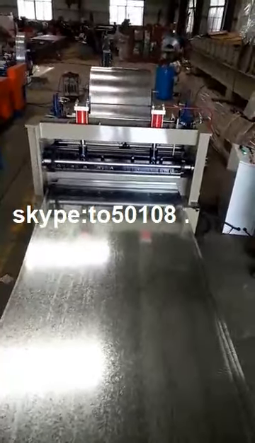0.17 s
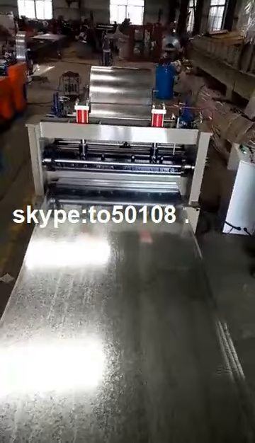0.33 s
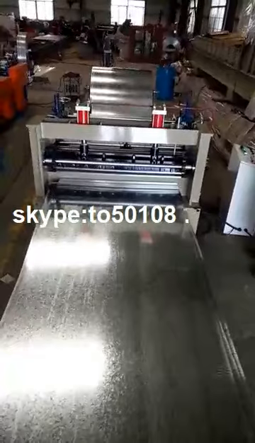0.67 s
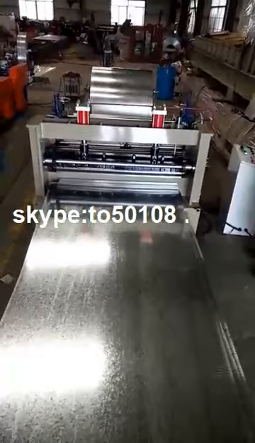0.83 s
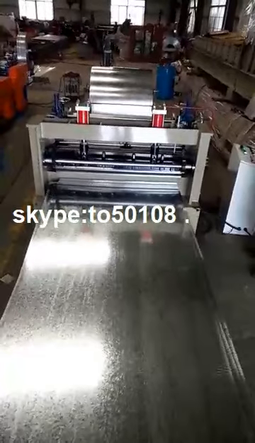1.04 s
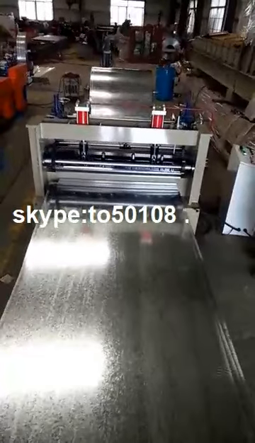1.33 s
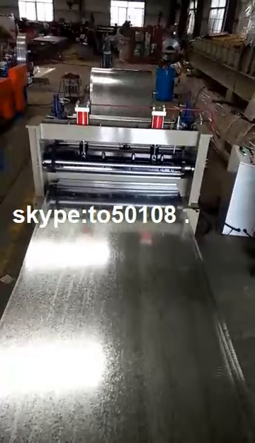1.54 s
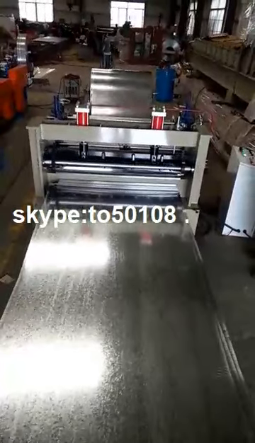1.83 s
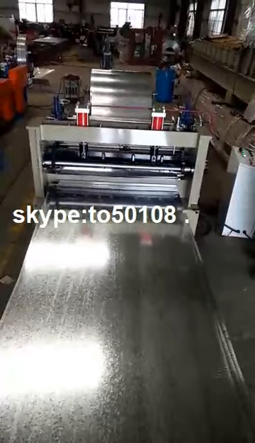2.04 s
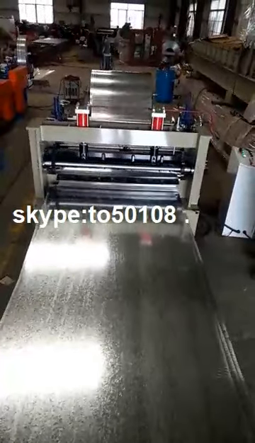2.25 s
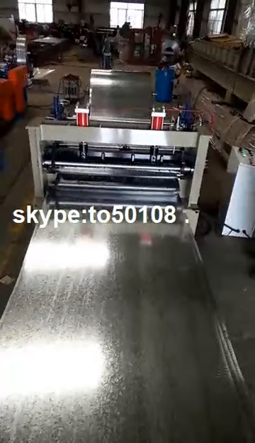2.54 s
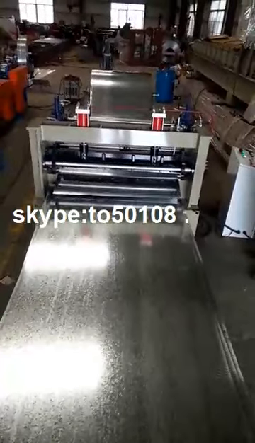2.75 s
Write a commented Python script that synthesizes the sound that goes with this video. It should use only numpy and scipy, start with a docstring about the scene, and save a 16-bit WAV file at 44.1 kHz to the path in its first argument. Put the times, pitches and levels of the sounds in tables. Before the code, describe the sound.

A moving metal sheet rumbles and flexes in a roaring factory hall after a distant steel clang

```python
"""A moving metal sheet rumbles, booms and flexes with soft bumps: shaped noise and wavering low modes.
It slides with a flickering hiss and scuffs over the rollers: swells of shaped noise.
At the start a piece of steel clangs some way off: beating modes ring out over a short noise crash.
Behind it, factory machinery roars steadily (shaped noise) with a faint, throbbing motor hum (tones)."""
import sys
import numpy as np
from scipy import signal
from scipy.fft import rfft, irfft, next_fast_len
from scipy.io import wavfile

SR = 44100
rng = np.random.default_rng(int(sys.argv[2]) if len(sys.argv) > 2 else 0)


def digitize_waveform(pressure):
    """Quantize a signal to 16-bit integers and store it at the path in sys.argv[1].

    Rows of a 2-D input are taken as channels; values are limited to [-1, 1].
    """
    field = np.atleast_2d(pressure).T
    bounded = np.clip(field, -1, 1)
    quanta = np.round(bounded * 32767).astype(np.int16)
    wavfile.write(sys.argv[1], SR, quanta)


N = 127449
T = np.arange(N) / SR

# sheet rumble spectrum: (frequency [Hz], relative density [dB])
RUMBLE_SPECTRUM = [(25, -21), (42, -24.5), (58, -8.5), (80, -9.5), (110, 0), (150, 2.5), (200, 3.5),
                   (280, 0), (370, 0.5), (520, -6), (800, -2), (2000, -78.5)]
# sheet rumble: (time [s], level [dB])
RUMBLE_LEVEL = [(0, -40), (.25, -40), (.45, -51), (1.11, -45.5), (1.16, -30.5), (1.3, -33.5), (1.42, -29),
                (1.54, -36), (1.66, -26.5), (1.88, -29), (2.0, -30), (2.3, -28), (2.5, -28.5),
                (2.89, -27.5)]
# lowest modes of the sheet: (frequency [Hz], relative level [dB])
BOOM_MODES = [(72, -1), (98, -2)]
# boom of those modes: (time [s], gain [dB])
BOOM_LEVEL = [(0, -56.5), (1.3, -56), (1.55, -43.5), (1.65, -33), (1.9, -37.5), (2.0, -40), (2.15, -39.5),
              (2.4, -34), (2.52, -55), (2.66, -33), (2.89, -39)]
# flexes of the sheet: (onset [s], level [dB], centre [Hz])
BUMPS = [(1.63, -27.5, 85), (1.69, -27.5, 280), (1.79, -29.5, 265), (1.85, -28.5, 105), (1.97, -29.5, 200),
         (2.08, -29, 290), (2.15, -31, 73), (2.25, -28.5, 100), (2.35, -29, 140), (2.77, -25, 253),
         (2.85, -22, 290)]
# sliding hiss spectrum: (frequency [Hz], relative density [dB])
HISS_SPECTRUM = [(4000, -32.5), (6500, -24.5), (7400, -11), (8600, 1.5), (10000, -16.5), (11400, 20),
                 (12400, 20.5), (14200, 14), (15500, -9)]
# sliding hiss: (time [s], level [dB])
HISS_LEVEL = [(0, -58), (.4, -97), (.9, -83), (1.02, -71.5), (1.08, -60), (1.27, -66.5), (1.4, -62),
              (1.6, -64.5), (1.67, -54), (1.9, -59.5), (2.13, -54.5), (2.2, -49.5), (2.3, -58), (2.5, -59),
              (2.72, -55.5), (2.79, -47.5), (2.89, -52)]
# scuffs on the rollers: (onset [s], level [dB], start of the falling noise band [Hz])
SCUFFS = [(2.15, -32.5, 9030), (2.738, -32, 9700)]
# scuff spectrum: (frequency [Hz], relative density [dB])
SCUFF_SPECTRUM = [(400, -16), (1500, 5), (2300, 1.5), (4000, -7.5), (5000, -15), (5600, -42), (6600, -45),
                  (7600, -29), (8600, -17.5), (10200, -44), (11200, -15.5), (12300, -20.5), (15000, -30)]
# modes of the struck steel: (frequency [Hz], relative level [dB], t60 [s], width [Hz])
STEEL_MODES = [(1260, -42, 1.9, 14), (1271, -39, 1.9, 14), (1421, -46, 1.8, 18), (1538, -39.5, 2.0, 20),
               (1684, -45, 1.7, 20), (2089, -52, 1.6, 18), (2213, -46, 1.9, 18), (2631, -53, 1.7, 18),
               (2740, -37.5, 2.2, 16), (2972, -40, 1.9, 18), (2988, -43, 2.4, 28), (3020, -49, 1.6, 30),
               (3322, -49, 2.5, 18), (3345, -51, 2.3, 24), (3401, -53, 2.0, 18), (3806, -46.5, 1.9, 24),
               (3823, -44, 2.0, 18), (4026, -54, 1.7, 26), (4691, -46, 1.7, 24), (4730, -57, 1.5, 30),
               (4844, -53, 1.45, 22), (5630, -54, 1.35, 22), (6586, -56, 1.2, 22), (7316, -70, .85, 40),
               (7562, -61.5, .95, 24), (8554, -68, .98, 22)]
# blows on the steel: (onset [s], relative level [dB])
CLANGS = [(.037, 4.5), (.078, 3), (.165, -2)]
# crash of the blows in the hall: (frequency [Hz], relative density [dB])
CRASH_SPECTRUM = [(200, -31), (700, 6), (1500, -8), (2300, -3.5), (3000, -3.5), (4300, -12.5), (5500, -31),
                  (7500, -20), (9500, -65), (12000, -21), (15000, -54)]
# machinery roar spectrum, lower part: (frequency [Hz], relative density [dB])
ROAR_SPECTRUM = [(15, -79), (25, -27), (69, -51.5), (92, -8), (220, -8.5), (245, -8.5), (293, -4.5),
                 (399, -6), (569, -4.5), (887, 0), (969, -2.5), (1380, -2), (2410, -14.5), (3920, -20.5),
                 (5000, -37), (6500, -139), (11000, -120)]
# machinery roar spectrum, top part: (frequency [Hz], relative density [dB])
ROAR_TOP_SPECTRUM = [(5400, -62), (8000, -58.5), (16000, -94.5)]
# machinery roar: (time [s], level [dB])
ROAR_LEVEL = [(0, -25.5), (.5, -26.5), (1.0, -27), (1.6, -26.5), (2.0, -25.5), (2.25, -24.5), (2.5, -25.5),
              (2.89, -25)]
# motor hum lines: (frequency [Hz], relative level [dB])
HUM_LINES = [(98, -47), (300, -42), (574, -47), (737, -49)]
# motor hum, before the throb: (time [s], gain [dB])
HUM_LEVEL = [(0, -4), (.28, 0.5), (.75, 1), (1.0, -3), (1.45, 1.5), (2.1, 3.5), (2.89, -1.5)]

BOOM_SCATTER, BOOM_WIDTH_HZ = 1.2, 12
BUMP_RISE_S, BUMP_T60_S, BUMP_STEP_OCT = 0.026, 0.42, 0.3
FLICKER_DB, FLICKER_HZ, PATCH_HZ = 2.2, 22, 700
SCUFF_RISE_S, SCUFF_T60_S = 0.086, 0.63
BAND_REL_DB, BAND_FALL_OCT_PER_S, BAND_WIDTH_HZ = -26, 1.4, 420  # level relative to the scuff
CRASH_REL_DB, CRASH_RISE_S, CRASH_T60_S = -33, 0.037, 0.55
RING_REL_DB, RING_RISE_S, RING_SCATTER = 1.5, 0.04, 0.85
SKIRT_REL_DB, SKIRT_WIDTH_HZ = -9.5, 80  # level relative to the mode line
HUM_SCATTER, HUM_WAVER_HZ = 0.29, 2
THROB_DEPTH, THROB_PERIOD_S, THROB_PEAK_S = 0.65, 0.37, 0.34
EDGE_HZ = 15350  # recorder's upper limit


def sheet_rumble():
    """The sheet shudders (noise), booms (low modes) and bumps (a noise band per flex)."""
    modes = sum(amp(db) * tone(hz, BOOM_SCATTER, BOOM_WIDTH_HZ) for hz, db in BOOM_MODES)
    out = level(RUMBLE_LEVEL) * noise(RUMBLE_SPECTRUM) + level(BOOM_LEVEL) * modes
    for onset_s, db, centre_hz in BUMPS:
        # bell-shaped band around the centre
        band = [(centre_hz * 2 ** (k * BUMP_STEP_OCT), -4 * k * k) for k in range(-5, 6)]
        out = out + amp(db) * swell(onset_s, BUMP_RISE_S, BUMP_T60_S) * noise(band)
    return out


def sheet_sliding():
    """Friction hiss plus scuffs over the rollers, with a faint falling narrow-band noise in each."""
    out = level(HISS_LEVEL) * noise(HISS_SPECTRUM)
    for onset_s, db, start_hz in SCUFFS:
        age_s = np.maximum(T - onset_s, 0)
        centre_hz = start_hz * 2 ** (-BAND_FALL_OCT_PER_S * age_s)
        phase = 2 * np.pi * np.cumsum(centre_hz) / SR
        falling_band = evened((drift(BAND_WIDTH_HZ) * np.exp(1j * phase)).real)
        scuff = noise(SCUFF_SPECTRUM) + amp(BAND_REL_DB) * falling_band
        out = out + amp(db) * swell(onset_s, SCUFF_RISE_S, SCUFF_T60_S) * scuff
    return uneven(out)


def uneven(x):
    """Friction catches and lets go: each narrow band flickers on its own."""
    f_hz, spectrum = np.fft.rfftfreq(N, 1 / SR), rfft(x)
    knots_s = np.arange(0, T[-1] + 1, 0.5 / FLICKER_HZ)
    out = 0
    for centre_hz in np.arange(0, EDGE_HZ, PATCH_HZ):
        triangle = np.maximum(1 - abs(f_hz - centre_hz) / PATCH_HZ, 0)
        band = irfft(spectrum * triangle, N)
        flicker_db = FLICKER_DB * np.interp(T, knots_s, rng.standard_normal(len(knots_s)))
        out = out + band * evened(amp(flicker_db))
    return out


def clang():
    """Steel rings some way off, beating modes over a short crash, both smeared by the hall."""
    out = amp(CRASH_REL_DB) * blows(CRASH_RISE_S, CRASH_T60_S) * noise(CRASH_SPECTRUM)
    for hz, db, t60_s, width_hz in STEEL_MODES:
        # broad skirt under each mode line
        skirt = evened((drift(SKIRT_WIDTH_HZ) * np.exp(2j * np.pi * hz * T)).real)
        ring = tone(hz, RING_SCATTER, width_hz) + amp(SKIRT_REL_DB) * skirt
        out = out + amp(RING_REL_DB + db) * blows(RING_RISE_S, t60_s) * ring
    return out


def blows(rise_s, t60_s):
    """Envelope of the blows on the steel, summed in power."""
    return np.sqrt(sum((amp(db) * swell(onset_s, rise_s, t60_s)) ** 2 for onset_s, db in CLANGS))


def machinery():
    """Hall roar as shaped noise; motor hum throbs as two drives beat slowly."""
    roar = noise(ROAR_SPECTRUM + ROAR_TOP_SPECTRUM)
    hum = sum(amp(db) * tone(hz, HUM_SCATTER, HUM_WAVER_HZ) for hz, db in HUM_LINES)
    throb = 1 + THROB_DEPTH * np.cos(2 * np.pi * (T - THROB_PEAK_S) / THROB_PERIOD_S)
    return level(ROAR_LEVEL) * roar + level(HUM_LEVEL) * throb * hum


def amp(db):
    """Decibels to gain."""
    return 10 ** (np.asarray(db) / 20)


def evened(x):
    """Scales to rms 1."""
    return x / np.sqrt(np.mean(abs(x) ** 2) + 1e-20)


def level(points):
    """Gain over time from (time [s], level [dB]) points."""
    return amp(np.interp(T, *np.transpose(points)))


def noise(points):
    """Noise of rms 1 shaped by (frequency [Hz], density [dB]) points, joined on a log axis."""
    hz, db = np.transpose(points)
    f_hz = np.fft.rfftfreq(N, 1 / SR)
    gain = amp(np.interp(np.log(f_hz + 1), np.log(hz), db))  # +1 avoids log(0)
    return evened(irfft(rfft(rng.standard_normal(N)) * gain, N))


def drift(rate_hz):
    """Complex low-passed noise of rms 1; it wanders faster at a higher rate."""
    f_hz = np.fft.fftfreq(next_fast_len(N), 1 / SR)
    chance = rng.standard_normal(len(f_hz)) + 1j * rng.standard_normal(len(f_hz))
    return evened(np.fft.ifft(chance / (1 + (f_hz / rate_hz) ** 2))[:N])


def tone(hz, scatter, width_hz):
    """A line of rms 1 whose strength and phase waver as its echoes overlap."""
    carrier = np.exp(2j * np.pi * (hz * T + rng.random()))
    return evened(((1 + scatter * drift(width_hz)) * carrier).real)


def swell(onset_s, rise_s, t60_s):
    """A smooth rise, then an exponential decay."""
    age_s = T - onset_s
    rise = np.sin(np.pi / 2 * np.clip(age_s / rise_s, 0, 1)) ** 2
    return rise * amp(-60 * np.maximum(age_s - rise_s, 0) / t60_s)


def scene():
    """All sources at one microphone."""
    return (sheet_rumble() + sheet_sliding() + clang() + machinery())[None]


def record(dry):
    """The recorder's band limit: a linear-phase low-pass."""
    lowpass = signal.firwin(511, EDGE_HZ, window=("kaiser", 9), fs=SR)
    return signal.oaconvolve(dry, lowpass[None], "same")


dry = scene()
out = record(dry)
digitize_waveform(out)
```